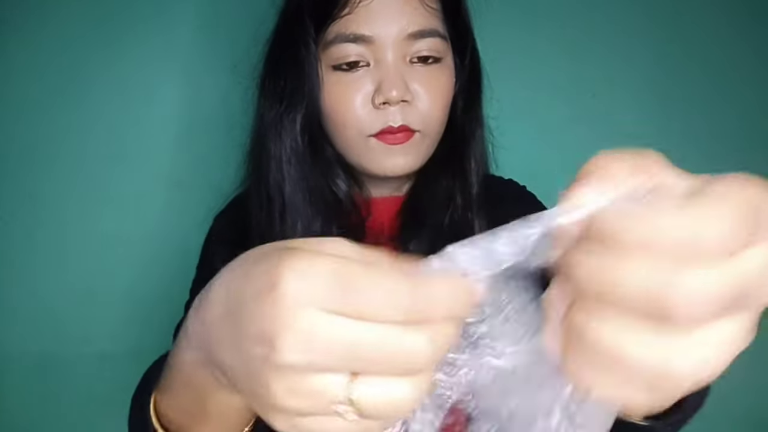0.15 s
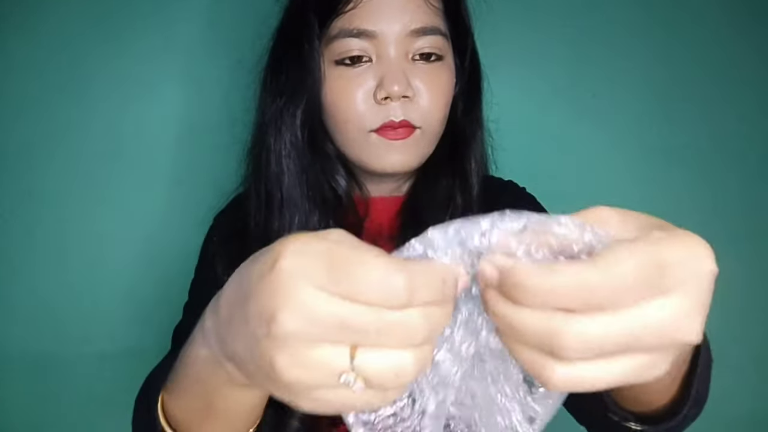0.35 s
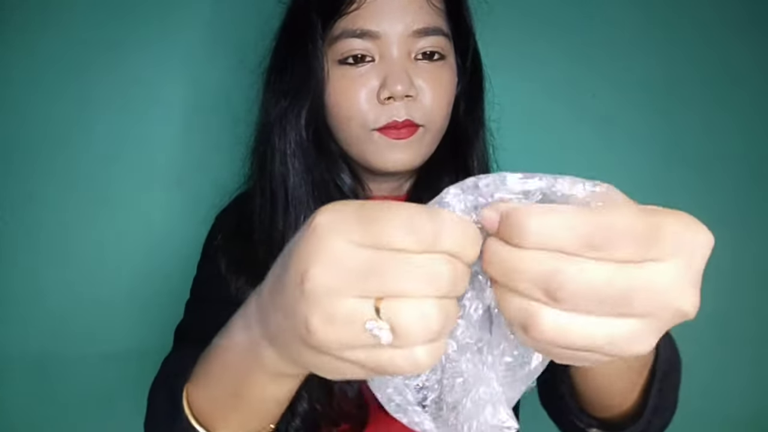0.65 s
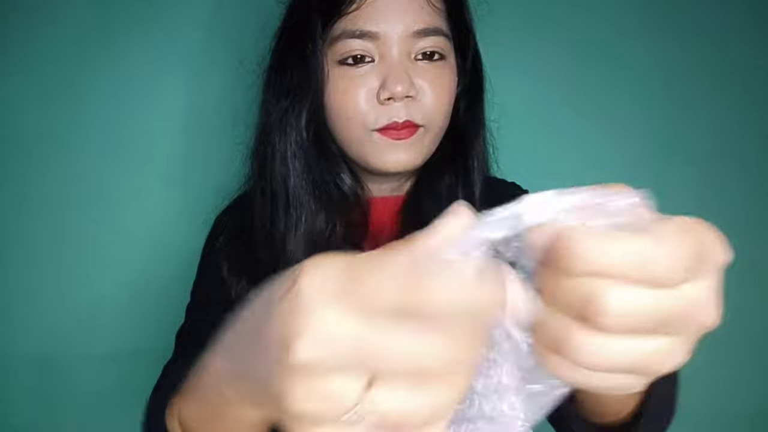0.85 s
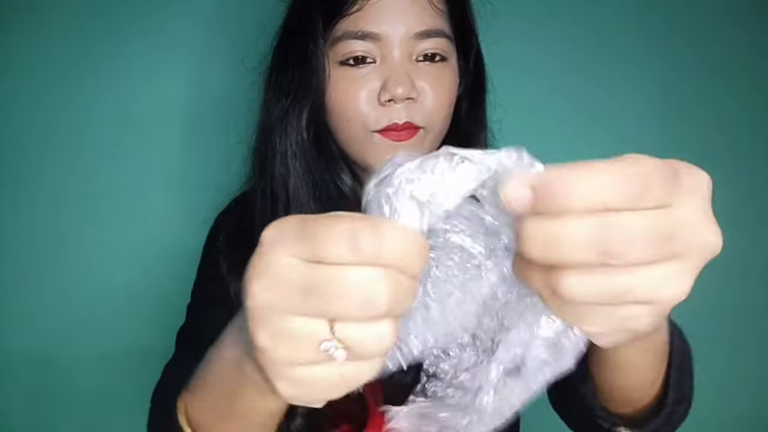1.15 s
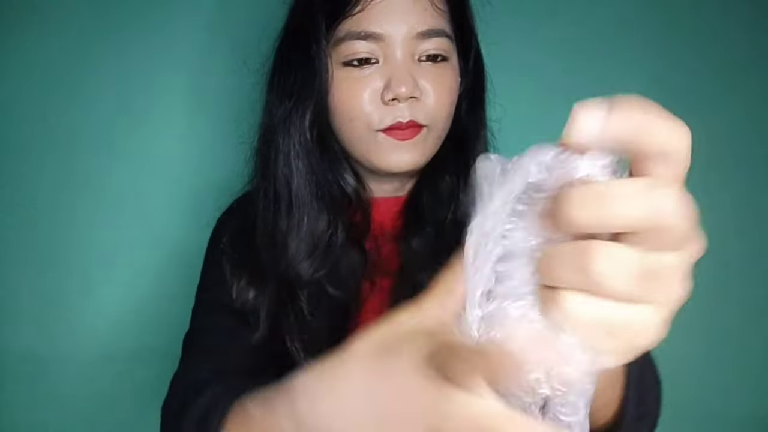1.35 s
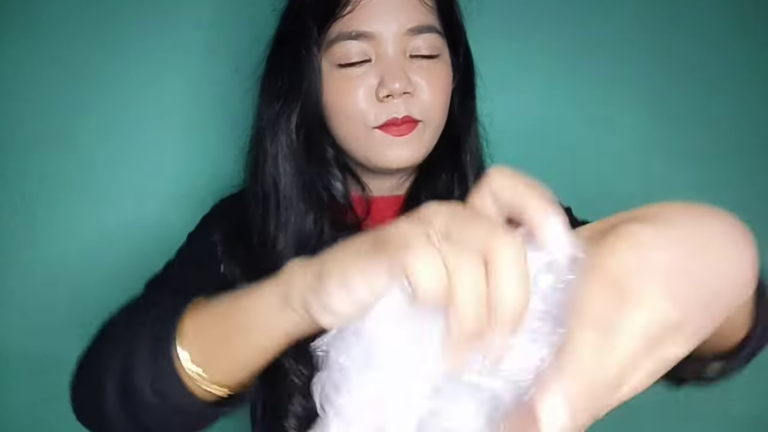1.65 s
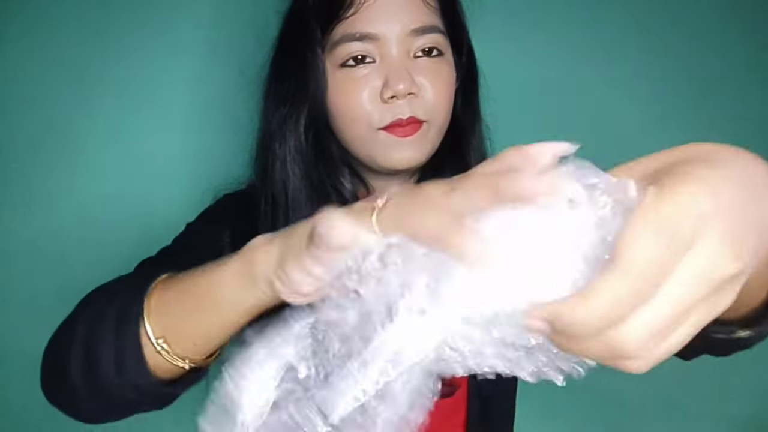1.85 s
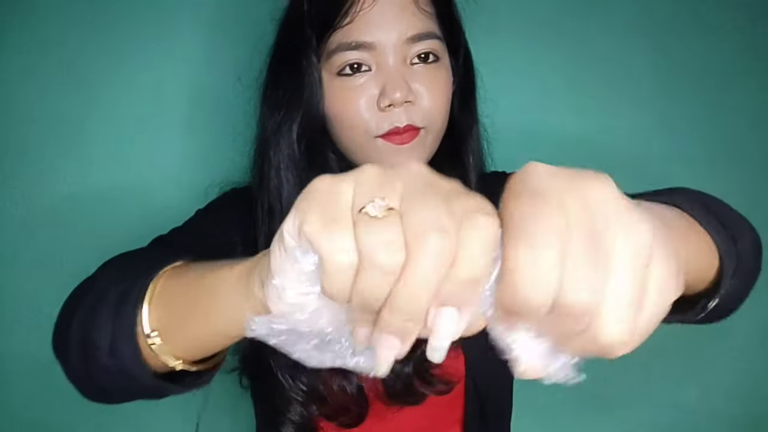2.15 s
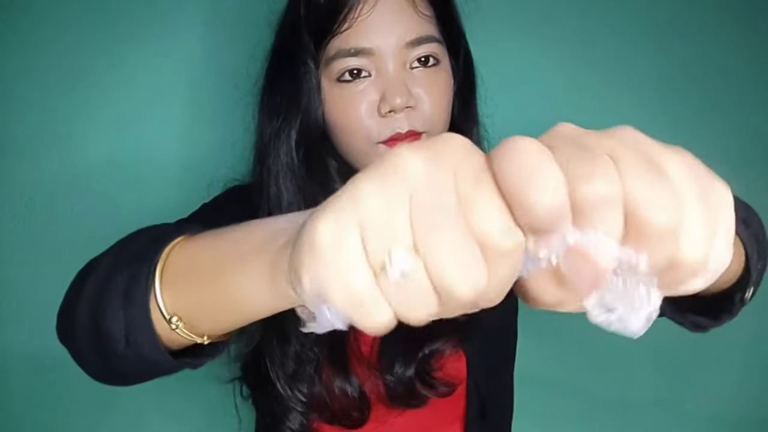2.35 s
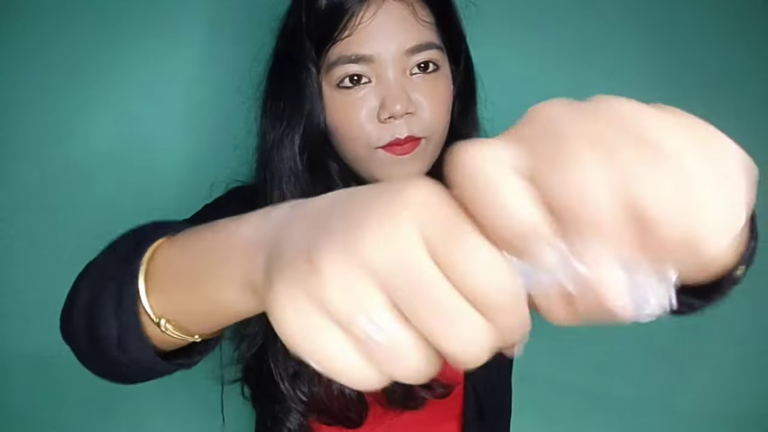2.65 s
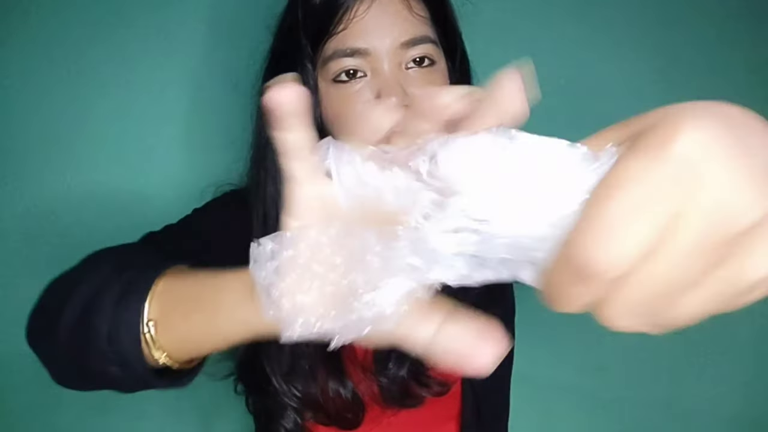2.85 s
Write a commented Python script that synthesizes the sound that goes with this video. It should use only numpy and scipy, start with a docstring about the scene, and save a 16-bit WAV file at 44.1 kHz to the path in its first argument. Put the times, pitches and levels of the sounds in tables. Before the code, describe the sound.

Close up in a small room, bubble wrap crinkles lightly and pops twice. Hands scrunch it into a denser crackle with little snapping creases, then twist out three quick pops before a last bit of crinkling.

```python
"""A sheet of bubble wrap crackles as two hands pinch, gather and wring it near a stereo microphone.
The film buckles in thousands of tiny clicks that follow the grip, and single creases snap as they flip.
Five bubbles burst with a sharp crack that the small room answers; the microphone rings near 5 kHz.
Short hollow knocks and one high ring of a snapping fold join in, over the room's faint rumble and hiss."""
import sys
import numpy as np
from scipy import signal
from scipy.fft import rfft, irfft
from scipy.io import wavfile
from scipy.ndimage import uniform_filter1d

SR = 44100
rng = np.random.default_rng(int(sys.argv[2]) if len(sys.argv) > 2 else 0)


def master(y):
    """Save y as 16-bit WAV."""
    cut = np.clip(np.atleast_2d(y).T, -1, 1)
    pcm = np.round(cut * 32767)  # scale
    wavfile.write(sys.argv[1], SR, pcm.astype(np.int16))


N = 132300  # 3 seconds

# How hard the hands work the sheet. Each row: time in seconds, dull level in dB, crisp level in dB.
GRIP = [(0, -45.5, -34.5), (0.04, -39.5, -31), (0.12, -41.5, -35), (0.18, -45.5, -39.5), (0.204, -44, -35),
        (0.26, -51.5, -44), (0.32, -53.5, -34), (0.36, -50, -43.5), (0.44, -60.5, -46.5), (0.5, -50, -34),
        (0.54, -50.5, -42), (0.62, -53, -39.5), (0.669, -39, -32.5), (0.75, -46, -42), (0.82, -36, -26.5),
        (0.89, -39.5, -34.5), (0.96, -48, -46), (1.04, -47, -40.5), (1.089, -33, -28.5), (1.114, -36, -33),
        (1.148, -30.5, -27), (1.23, -39.5, -37), (1.249, -30.5, -28), (1.31, -36.5, -33.5),
        (1.34, -33, -29.5), (1.46, -30.5, -28.5), (1.506, -30, -29), (1.525, -37.5, -40),
        (1.56, -43.5, -44), (1.601, -47.5, -45), (1.64, -29.5, -24.5), (1.71, -26, -26),
        (1.82, -31.5, -31.5), (1.87, -26.5, -30), (1.902, -35, -34), (1.94, -26, -27), (2.01, -30.5, -26.5),
        (2.06, -30, -30.5), (2.118, -29, -27), (2.24, -41.5, -31.5), (2.29, -55, -40.5), (2.33, -49, -47.5),
        (2.361, -33, -25.5), (2.42, -45, -33.5), (2.47, -55, -54), (2.519, -52, -44.5), (2.554, -43, -23.5),
        (2.62, -58, -44.5), (2.66, -64, -51.5), (2.685, -48, -35.5), (2.72, -44.5, -24.5),
        (2.77, -37.5, -29), (2.82, -41.5, -42), (2.875, -43.5, -42.5), (2.905, -52, -40),
        (2.929, -34, -33.5), (3.0, -41.5, -32)]
# The tone of the sheet's dull body. Each row: frequency in Hz, level in dB.
DULL_TONE = [(30, -17), (120, -8.5), (230, -10.5), (385, -3.5), (540, -8.5), (1000, -2.5), (1300, -6.5),
             (1750, -1.5), (2050, 4.5), (2350, 0.5), (2850, 0.5), (3500, -5.5), (4300, -8.5), (7000, -60.5)]
# The tone of the crisp crackle, with the microphone's ring near 5 kHz.
# Each row: frequency in Hz, level in dB.
CRISP_TONE = [(1000, -47.5), (3000, -10.5), (4200, -9.5), (4850, 3), (5400, 1), (6200, -7.5), (7200, -12.5),
              (10800, -14), (12000, -11), (15500, -8)]


def crinkle():
    """The same buckles make a dull crumple and a crisp crackle, as hard as the hands work the sheet."""
    times, dull_db, crisp_db = np.transpose(GRIP)
    shared, apart = buckles()
    out = np.zeros((2, N))
    # A width of 0 is what both sides share; at 1, left and right each hear their own sound.
    for tone, db, width in (DULL_TONE, dull_db - 3.5, 0.22), (CRISP_TONE, crisp_db - 1, 0.96):
        clicks = np.sqrt(1 - width) * shared + np.sqrt(width) * apart
        loudness = amp(np.interp(np.arange(N) / SR, times, db))
        out += unit(convolve(clicks, ring(tone))) * loudness
    out = folds(out)
    return out + amp(-11) * room(out)


def buckles(facets=24, size=128):
    """Tiny flat patches of film (facets) click in clumps: what both sides share, and what each hears."""
    clicks_per_s, clump_s, decay_s, max_lag_s = 4500, 0.005, 0.00027, 0.00007
    clumps = unit(uniform_filter1d(rng.standard_normal(N), round(clump_s * SR)))
    strength = amp(1.7 * np.minimum(rng.exponential(1, N), 5) + 1.8 * clumps)
    clicks = strength * rng.choice([-1, 1], N) * (rng.random(N) < clicks_per_s / SR)
    clicks /= np.sqrt(abs(uniform_filter1d(clicks ** 2, 1500)) + 1e-9)  # even out slow swells
    facet_of_click = rng.integers(0, facets, N)
    t, hz = np.arange(size) / SR, np.fft.rfftfreq(size, 1 / SR)
    tones = rfft(rng.standard_normal((facets, 3, size)) * np.exp(-t / decay_s))
    tones /= np.sqrt((abs(tones) ** 2).mean(0))
    lags = (2 * rng.random(facets) - 1) * max_lag_s  # each facet reaches one side first
    out = np.zeros((4, N))
    for k, lag in enumerate(lags):
        delays = (max_lag_s + np.array([[lag], [-lag]])) / 2
        shared = tones[k, 0] * np.exp(-2j * np.pi * hz * delays)
        shapes = irfft(np.vstack([shared, tones[k, 1:]]))
        out += signal.oaconvolve((clicks * (facet_of_click == k))[None], shapes, axes=1)[:, :N]
    return out[:2], out[2:]


def folds(x):
    """The folds of the sheet form small hollows whose ringing pitches keep shifting."""
    depth_db, width_hz, shift_s, top_hz = 4.8, 170, 0.02, 3140
    hz, t, spectrum = signal.stft(x, SR, nperseg=512, noverlap=384)
    ripple = uniform_filter1d(rng.standard_normal(spectrum.shape[1:]), round(width_hz / hz[1]), axis=0)
    ripple = unit(uniform_filter1d(ripple, round(shift_s / t[1]), axis=1))
    gain = amp(depth_db * ripple / (1 + (hz[:, None] / top_hz) ** 2))
    gain /= np.sqrt((gain ** 2).mean(1, keepdims=True))
    return signal.istft(spectrum * gain, SR, nperseg=512, noverlap=384)[1][:, :N]


# Where the sheet is held. Each row: time in seconds, left over right in dB.
SHEET_PAN = [(0, 3), (.55, 4.5), (.72, 1.5), (1.05, 2.5), (1.6, 1), (2.28, 1.8), (2.35, -2), (2.45, -2),
             (2.85, 5.5)]


def sheet_pan():
    """Left and right gains as the sheet moves between the hands."""
    return pan(np.interp(np.arange(N) / SR, *np.transpose(SHEET_PAN)))


# Short sharp clicks: creases snapping, and one distinct echo of the first burst. Each row: start in
# seconds, level in dB, bass boost in dB, treble boost in dB, fade time of the flutter in seconds.
SNAPS = [(0.1138, -25.5, -3, 3.5, 0.0028), (0.1423, -33.5, 7, 6, 0.00023), (0.1918, -26.5, -6, 1, 0.0047),
         (0.201, -29, 14.5, 17, 0.00085), (0.2836, -36, 3, 11, 0.00045), (0.2999, -31.5, 10, 0, 0.0014),
         (0.319, -33, -7, 13, 0.00043), (0.3772, -35.5, -15, -10, .003), (.472, -29.5, -1, 3.5, 0.0014),
         (0.4843, -25.5, -4, 21, 0.0017), (.4995, -25, -11, -7, 0.00074), (0.502, -26.5, 3, 16, 0.0028),
         (0.5643, -34.5, -14, 10.5, 0.0011), (0.5804, -32, -8, 22, 0.00037),
         (0.6606, -24.5, -5, -8, 0.00051), (0.7067, -28, -2, 15, 0.0012), (0.7653, -37, -6, -3, .0005),
         (0.7738, -31, -2, -3, 0.0026), (0.7911, -21.5, 8, 0, 0.00049), (.797, -18, -3, 9, 0.00079),
         (1.002, -32.5, -3, -2, 0.0056), (1.0284, -41, 2, 5, 0.0007), (1.0909, -33.5, 6, 4, 0.00097),
         (1.1335, -33, -9, 0, .0006), (1.142, -27.5, -13, -15, .0004), (1.2385, -34.5, -9.5, 19.5, 0.0011),
         (1.2439, -25.5, 20.5, 11, 0.0038), (1.46, -24, 3, -10, 0.0013), (1.6274, -30, -12, 9, 0.00084),
         (1.6488, -20.5, 10.5, 2.5, 0.005), (1.669, -29, -18, -5.5, 0.00028),
         (1.7008, -19.5, -8, -11, 0.0013), (1.732, -31, -9, -14, 0.0005), (1.862, -21, -8, -2, 0.0031),
         (1.9264, -23, -19, -25, 0.0015), (1.9473, -25.5, -2, -1, 0.00083), (2.004, -19.5, 0, -6, 0.0031),
         (2.012, -23.5, 1, -6, 0.00084), (2.0947, -24, -9, -1, 0.0018), (2.1085, -23, -15, -5.5, 0.00035),
         (2.1686, -21, -15, -36, 0.0019), (2.3423, -30.5, 21, 14, 0.0013), (2.367, -22, 9, 6, 0.0021),
         (2.3784, -25.5, 16, 21, 0.0013), (2.5384, -27, 2, 0, 0.0026), (2.6677, -36, -21, 2, 0.0016),
         (2.7335, -21, -14, 2.5, .0001), (2.7762, -28.5, -11, -10, 0.00031),
         (2.8676, -32.5, -17, -6, 0.0023), (2.8815, -37, -16, -2, 0.00106), (2.924, -30.5, -8, 6, 0.0026)]
# The tone of a snap, with the microphone's ring near 5 kHz. Each row: frequency in Hz, level in dB.
SNAP_TONE = [(20, -32), (120, -11), (400, -11.5), (1000, -9.5), (2000, -4.5), (3100, -1), (4100, -4.5),
             (5000, 4), (6000, -0.5), (7300, -11.5), (10500, -10), (15000, -11.5)]


def snaps():
    """Sharp clicks with a short flutter: creases flipping over, and one echo of the first burst."""
    out = np.zeros((2, N))
    for start_s, db, bass_db, treble_db, decay_s in SNAPS:
        click = convolve(crack(decay_s, hiss=2.1), ring(SNAP_TONE, bass_db, treble_db))
        add(out, start_s, at_level(click, db))
    return out + amp(-4) * room(out)


# Bubbles that burst. Each row: start in seconds; then in dB the level, bass boost, treble boost,
# left over right, bounce and share sent to the room; air note in Hz, its level in dB, ping boost in dB.
POPS = [(0.6455, -12, -1.5, 6, 4, -2, -16, 810, -30.5, -4),
        (0.7991, -14, 6, 5, 12, -3.5, -16, 364, -31.5, -5),
        (2.3702, -12.5, -3, 9, 3, 0, -17, 203, -29.5, -2),
        (2.4304, -15, -3.5, 3.5, 8.5, -3.5, -14.5, 1960, -30, 1),
        (2.5391, -11, -10, 4.5, 9, 2.5, -12, 683, -31.5, 6)]
# The tone of a burst, with the microphone's ring near 5 kHz. Each row: frequency in Hz, level in dB.
POP_TONE = [(20, -16), (80, -6.5), (200, -5.5), (480, -11), (1000, -6), (1600, -7), (2800, -6.5),
            (4000, -3.5), (4900, 2), (5800, -6.5), (7200, -12), (10000, -16), (15000, -14.5)]
# Single echoes off the walls. Each row: delay in seconds, level in dB.
ECHOES = [(0.0166, -9), (0.0351, -14.5)]
# The tone of what the walls send back. Each row: frequency in Hz, level in dB.
ECHO_TONE = [(100, -5), (1500, -3), (3500, -4.5), (5800, 0), (7500, -3), (15000, -5)]


def pops():
    """A bubble splits: a crack with a hollow note and a bright ping, a nearby bounce, then the room."""
    decay_s, bounce_s, ping_hz, ping_octaves = 0.0007, 0.0016, 5370, 0.16
    out, to_room = np.zeros((2, N)), np.zeros((2, N))
    hz = np.geomspace(20, SR / 2, 300)
    ping = np.exp(-(np.log2(hz / ping_hz) / ping_octaves) ** 2)
    for start_s, db, bass_db, treble_db, pan_db, bounce_db, room_db, note_hz, note_db, ping_db in POPS:
        tone = np.column_stack([hz, read(POP_TONE, hz) + ping_db * ping])
        burst = crack(decay_s, hiss=1.7)
        add(burst, bounce_s, amp(bounce_db) * crack(decay_s, hiss=1.7))
        burst = convolve(burst, ring(tone, bass_db, treble_db))
        burst = at_level(burst * pan(pan_db), db)
        note = short_note(note_hz, decay_s=0.001, size=burst.shape[1])
        burst += at_level(note * pan(pan_db), note_db)
        add(out, start_s, burst)
        add(to_room, start_s, amp(room_db) * burst)
    to_room = amp(0.5) * convolve(to_room, ring(ECHO_TONE))
    for delay_s, db in ECHOES:
        add(out, delay_s, amp(db) * to_room)
    return out + room(to_room)


def crack(decay_s, hiss, size=2048):
    """A sharp spike and a short flutter of film whose treble differs between left and right."""
    hz = np.fft.rfftfreq(size, 1 / SR)
    shared = 0.76 / (1 + (hz / 1900) ** 2)
    noise = rfft(rng.standard_normal((3, size)))
    flutter = irfft(np.sqrt(shared) * noise[0] + np.sqrt(1 - shared) * noise[1:])
    flutter *= np.exp(-np.arange(size) / SR / decay_s)
    flutter *= hiss / np.linalg.norm(flutter, axis=1, keepdims=True)
    flutter[:, 0] = 1  # the spike
    return flutter


# Knocks and one ringing fold. Each row: start in seconds, level in dB, pitch in Hz,
# fade time in seconds, left over right in dB.
RINGING_NOTES = [(.1926, -28.5, 3030, 0.00085, 3), (0.801, -40, 60, 0.0097, 15),
                 (1.315, -37.5, 66.6, 0.012, 5), (1.452, -31.5, 1027, .004, 0),
                 (2.004, -33.5, 138, 0.011, 9), (2.342, -32, 804, 0.00045, -10),
                 (2.371, -33, 121, 0.004, 16.5)]


def ringing_notes():
    """Short ringing notes: low knocks and one high ring of a snapping fold."""
    out = np.zeros((2, N))
    for start_s, db, hz, decay_s, pan_db in RINGING_NOTES:
        add(out, start_s, at_level(short_note(hz, decay_s) * pan(pan_db), db))
    return out + amp(-4) * room(out)


def short_note(hz, decay_s, size=4096):
    """One pitch that swells quickly and dies away."""
    t = np.arange(size) / SR
    return np.sin(2 * np.pi * hz * t) * t * np.exp(-t / decay_s)


# How long the room rings. Each row: frequency in Hz, seconds to fade by 60 dB.
ROOM_FADE = [(100, 0.092), (500, 0.059), (2000, 0.071), (5000, 0.065), (15000, 0.029)]
# The tone of the room's ring. Each row: frequency in Hz, level in dB.
ROOM_TONE = [(100, -5), (1200, 7), (2500, 5), (4000, 7.5), (5200, 4.5), (7500, 9.5), (15000, 1)]


def room(x, size=16384):
    """The small room sends back scattered reflections, each frequency fading at its own speed."""
    reflections_per_s, gap_s = 4000, 0.0047
    reflections = rng.choice([-1., 1.], (2, size)) * (rng.random((2, size)) < reflections_per_s / SR)
    hz, t, spectrum = signal.stft(reflections, SR, nperseg=256)
    fade = amp(read(ROOM_TONE, hz)[:, None] - 60 * t / read(ROOM_FADE, hz)[:, None])
    tail = signal.istft(spectrum * fade, SR, nperseg=256)[1]
    tail /= np.linalg.norm(tail, axis=1, keepdims=True)
    return convolve(x, np.pad(tail, ((0, 0), (round(gap_s * SR), 0))))


# The tone of the room's own noise. Each row: frequency in Hz, level in dB.
RUMBLE_TONE = [(20, -10), (60, 2.5), (100, 0), (140, 2.5), (200, 0.5), (300, -8.5), (500, -14), (1500, -38),
               (5000, -28), (8000, -32), (15000, -15)]


def room_rumble():
    """Faint steady rumble and hiss of the room, mostly the same on both sides."""
    noise = rng.standard_normal((3, N))
    rumble = convolve(noise[:1] + 0.3 * noise[1:], ring(RUMBLE_TONE))
    return amp(-59.5) * pan(-0.5) * unit(rumble)


def ring(tone, bass_db=0, treble_db=0, size=2048):
    """How one click rings with a given tone, with the bass and treble turned up or down."""
    bass_hz, treble_hz = 1360, 6760
    hz = abs(np.fft.fftfreq(size, 1 / SR))
    db = read(tone, hz) + bass_db / (1 + (hz / bass_hz) ** 4)
    db += treble_db / (1 + (treble_hz / (hz + 1)) ** 6)
    spectrum = np.exp(np.conj(signal.hilbert(np.log(amp(db)))))  # packs the energy at the start
    taps = np.fft.ifft(spectrum).real
    return taps / np.linalg.norm(taps)


def amp(db):
    """Turns decibels into a gain."""
    return 10 ** (np.asarray(db) / 20)


def unit(x):
    """Scales a sound to an average power of 1."""
    return x / np.sqrt(np.mean(x ** 2) + 1e-20)


def at_level(sound, db):
    """Sets a click's level as if all its energy fell within 3 ms."""
    return amp(db) * sound * np.sqrt(0.003 * SR / (sound ** 2).sum(1).mean())


def read(points, hz):
    """Looks up a table between its rows, on a scale of octaves."""
    row_hz, value = np.transpose(points)
    return np.interp(np.log(hz + 1), np.log(row_hz + 1), value)


def pan(db):
    """Left and right gains, with the left louder by db."""
    return amp(np.vstack([db, -db]) / 2)


def add(mix, start_s, sound):
    """Mixes a stereo sound in at its start time."""
    part = mix[:, round(start_s * SR):][:, :sound.shape[1]]
    part += sound[:, :part.shape[1]]


def convolve(x, taps):
    """Filters each channel and keeps its length."""
    return signal.fftconvolve(x, np.atleast_2d(taps), axes=1)[:, :x.shape[1]]


def scene():
    """Crinkling, snaps, ringing notes and bursts over the quiet room."""
    sheet = (crinkle() + snaps()) * sheet_pan()
    return sheet + ringing_notes() + pops() + room_rumble()


def record(dry):
    """Rounds off the loudest cracks, then cuts the treble above 15700 Hz."""
    lowpass = signal.firwin(255, 15700, window=("kaiser", 9), fs=SR)
    return signal.oaconvolve(np.tanh(dry), lowpass[None], "same")


dry = scene()
out = record(dry)
master(out)
```